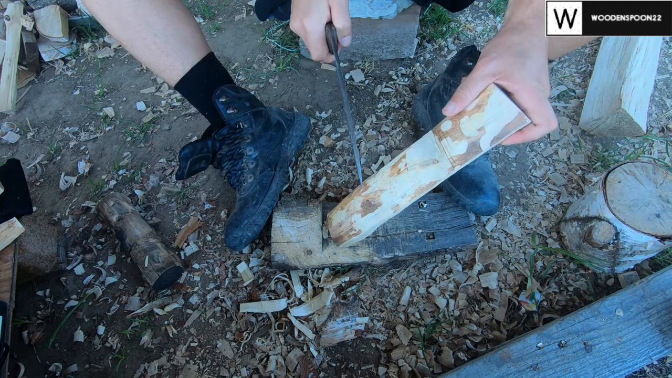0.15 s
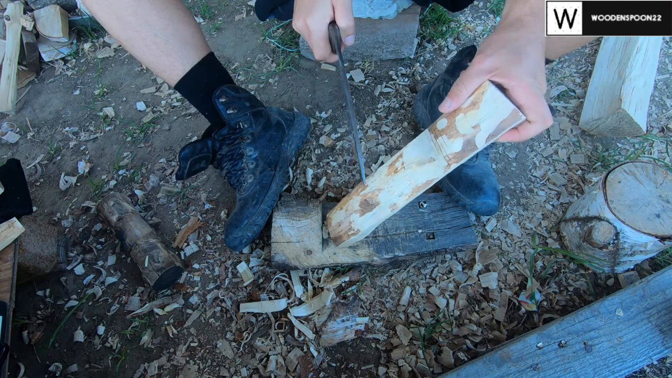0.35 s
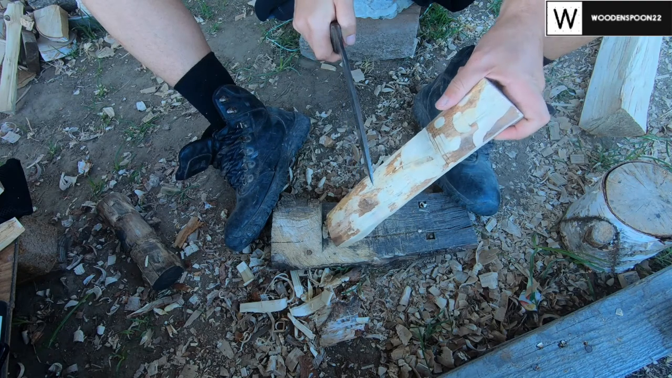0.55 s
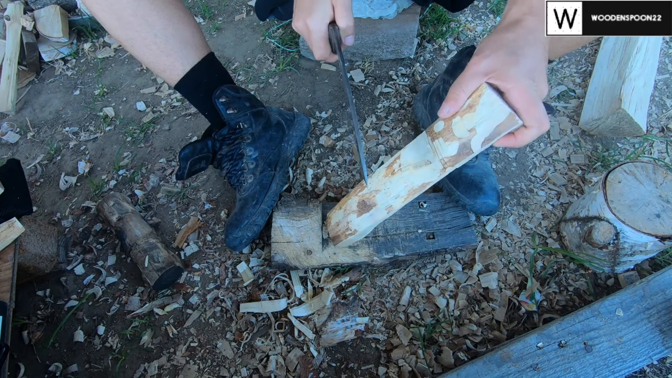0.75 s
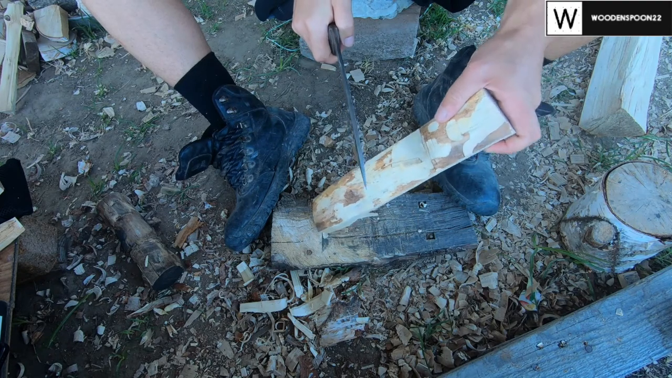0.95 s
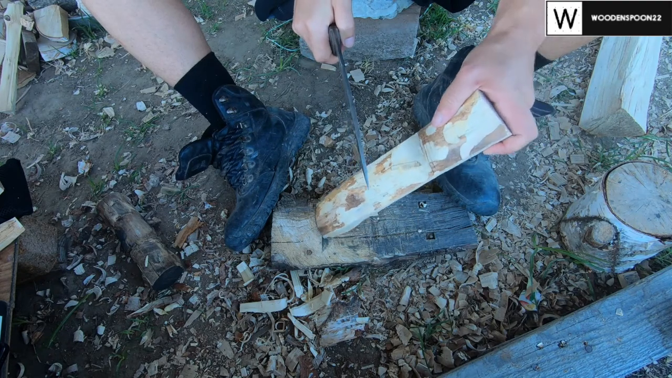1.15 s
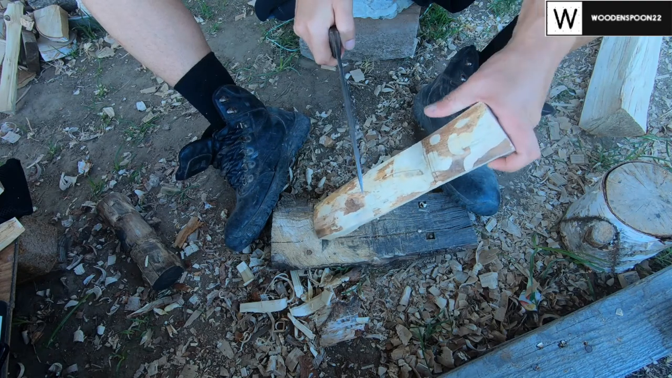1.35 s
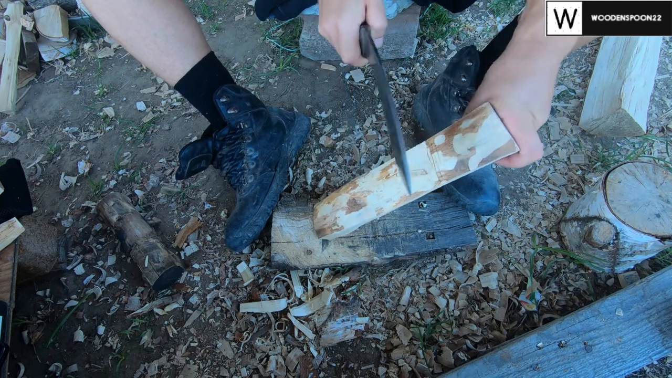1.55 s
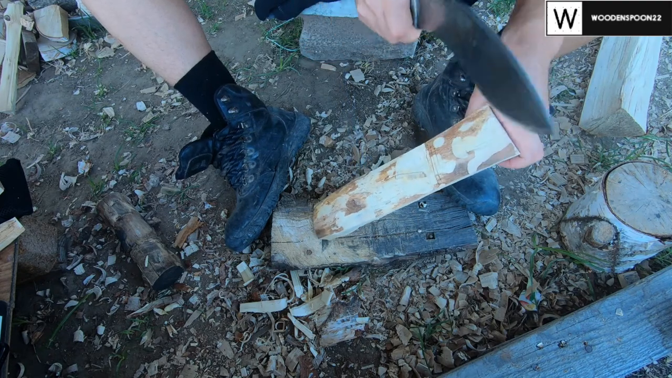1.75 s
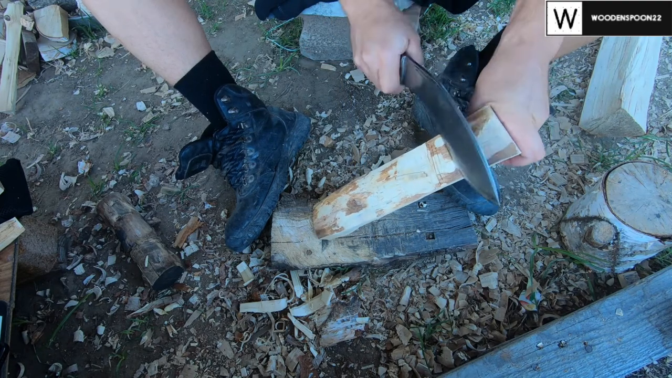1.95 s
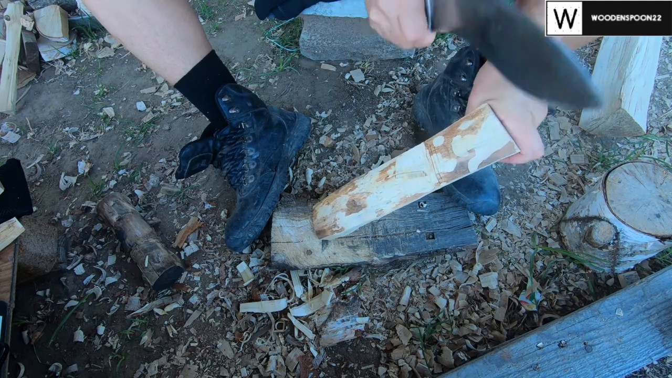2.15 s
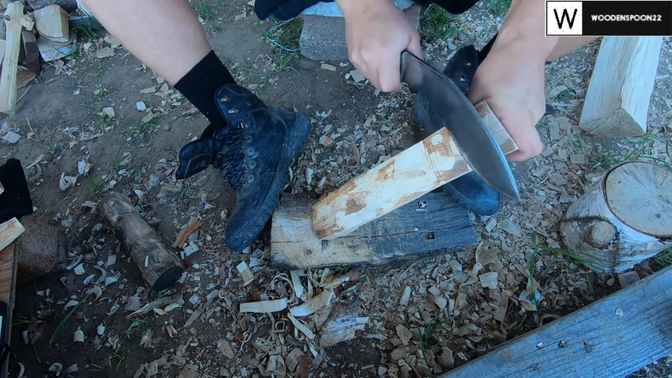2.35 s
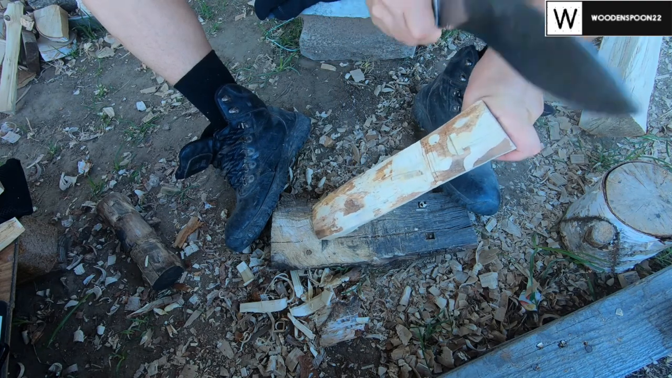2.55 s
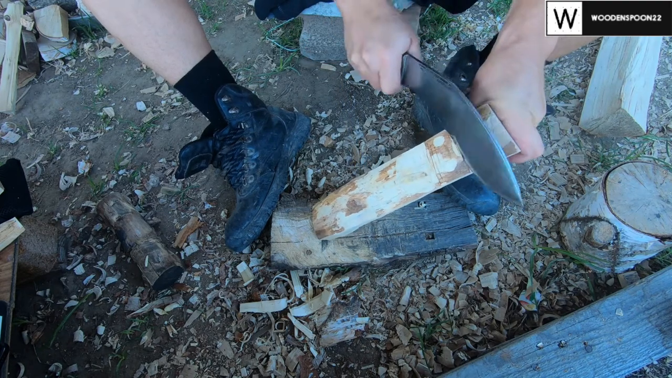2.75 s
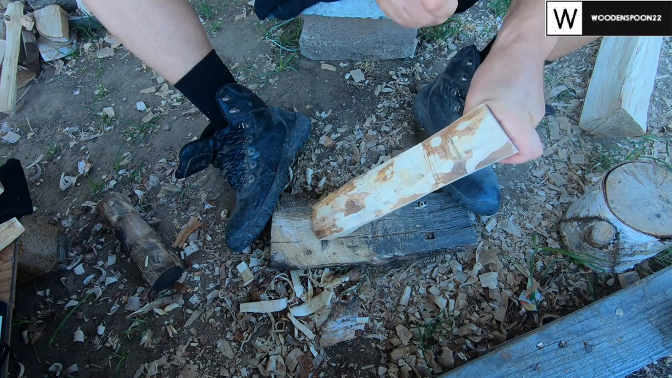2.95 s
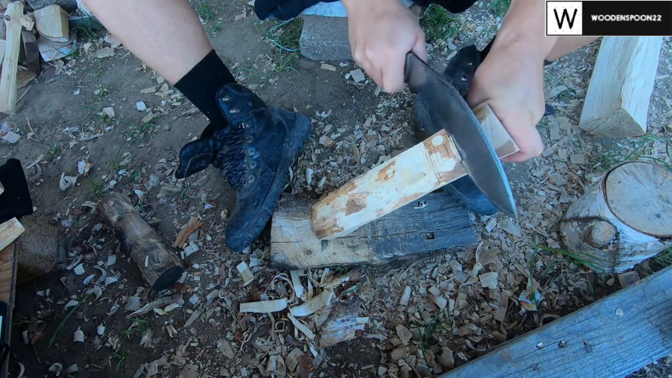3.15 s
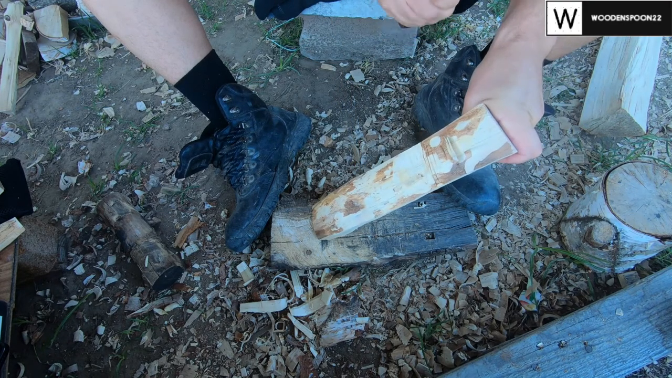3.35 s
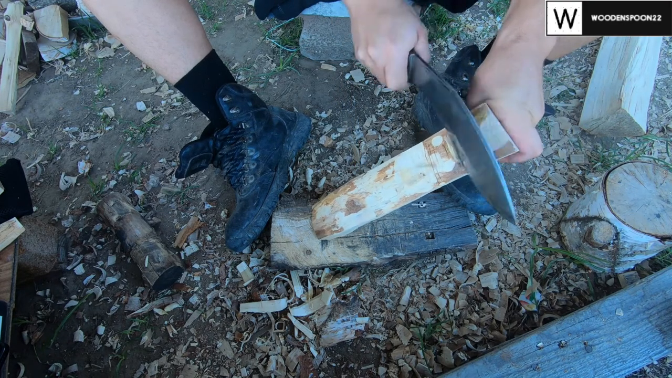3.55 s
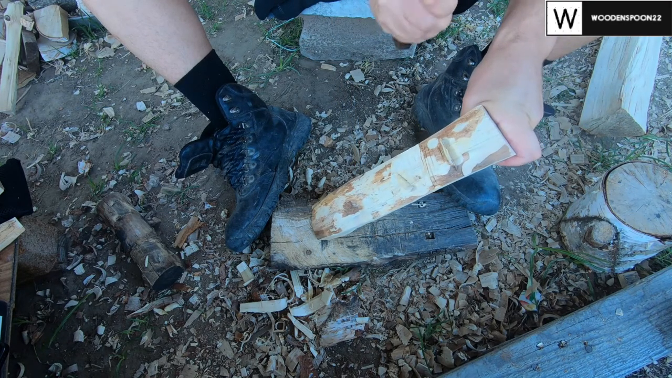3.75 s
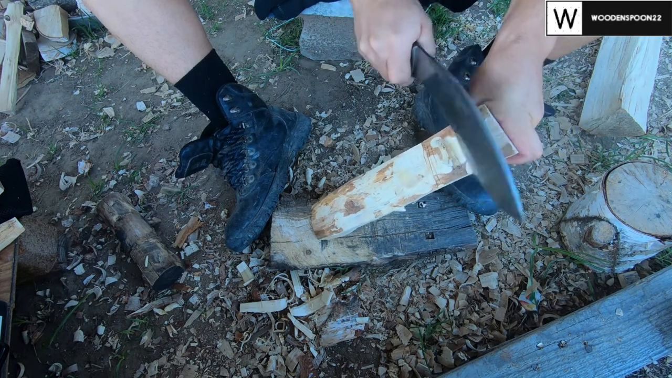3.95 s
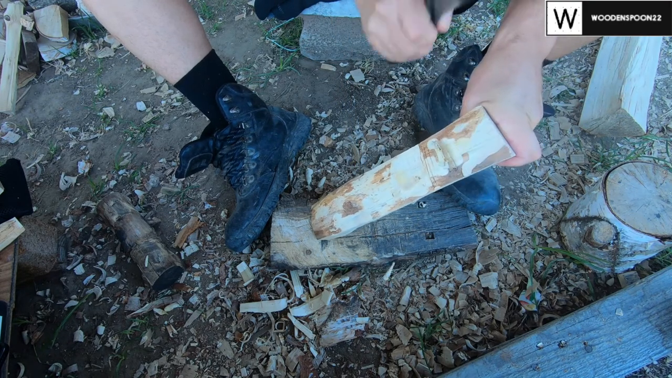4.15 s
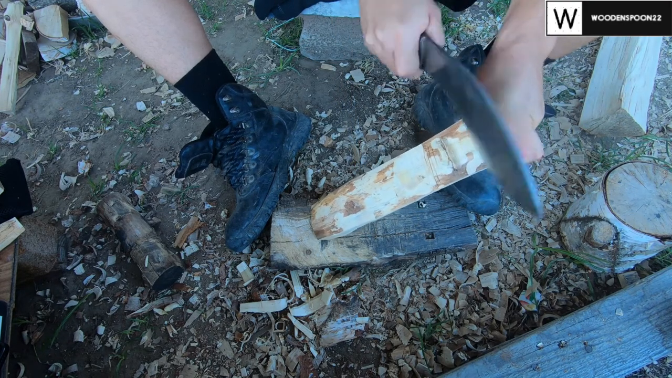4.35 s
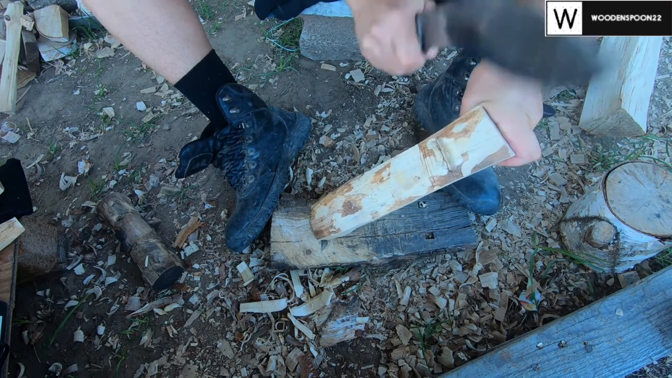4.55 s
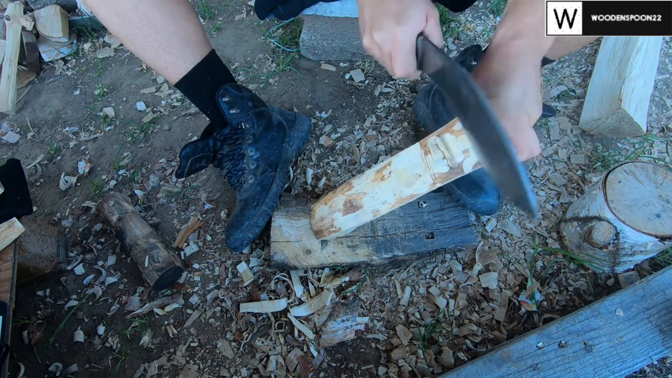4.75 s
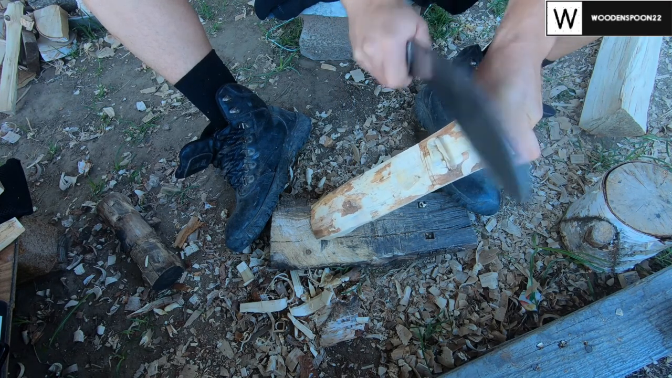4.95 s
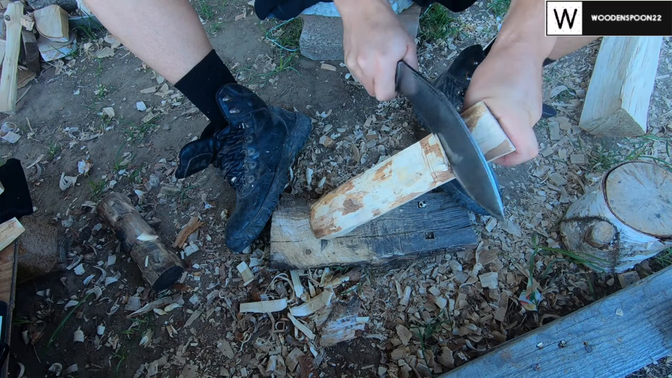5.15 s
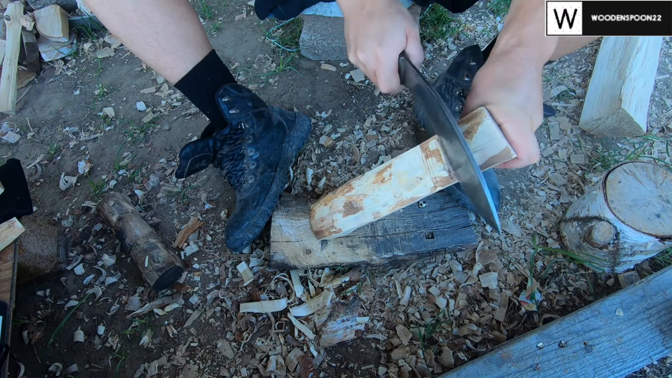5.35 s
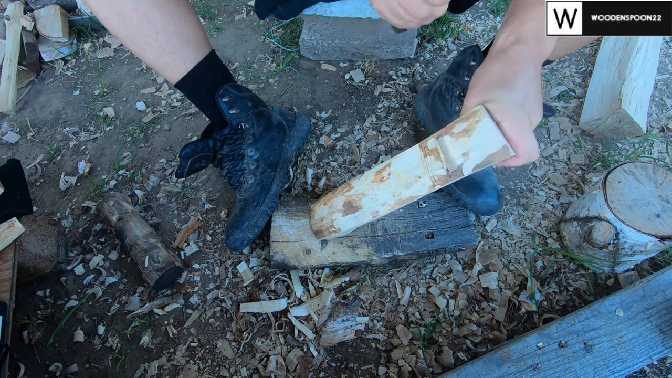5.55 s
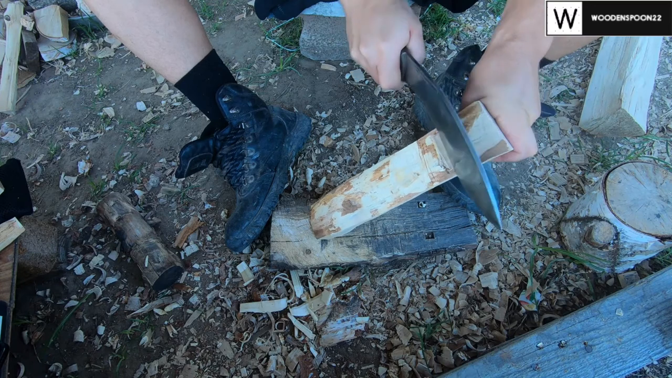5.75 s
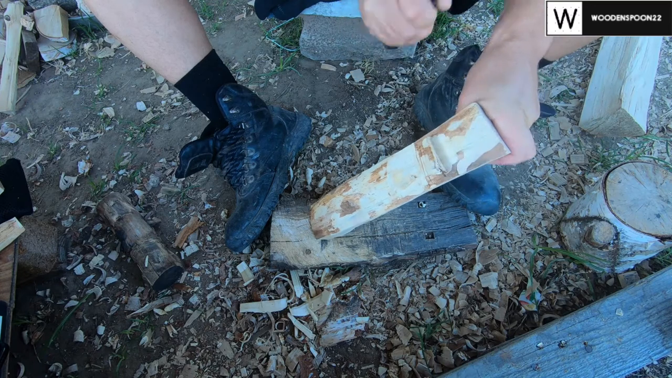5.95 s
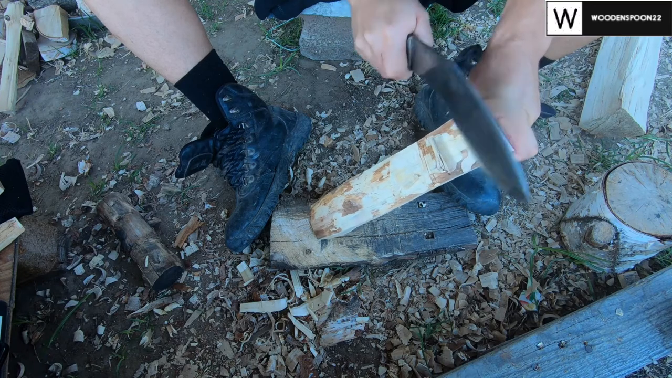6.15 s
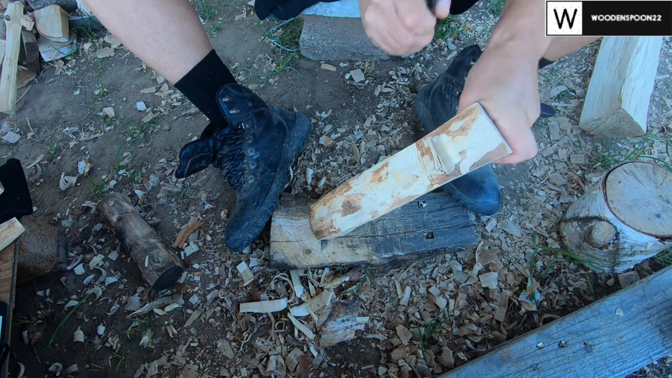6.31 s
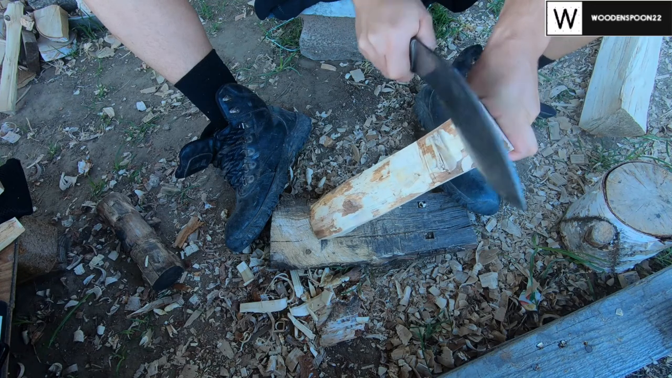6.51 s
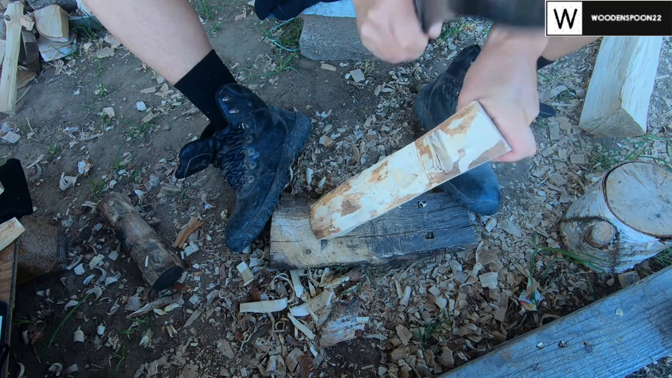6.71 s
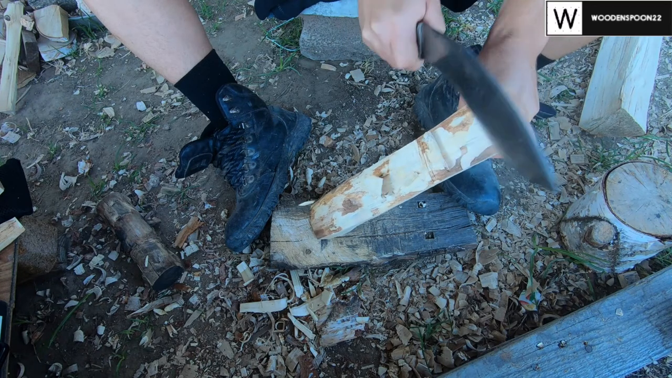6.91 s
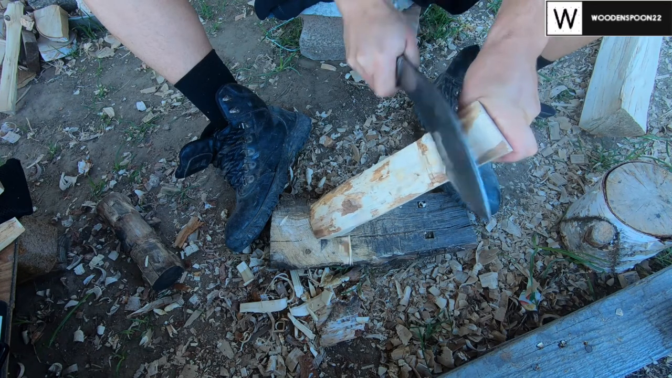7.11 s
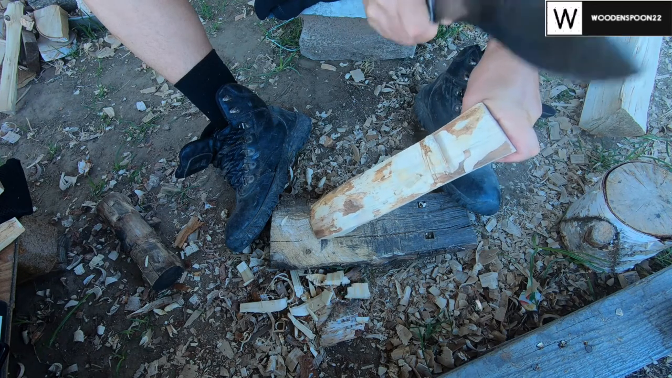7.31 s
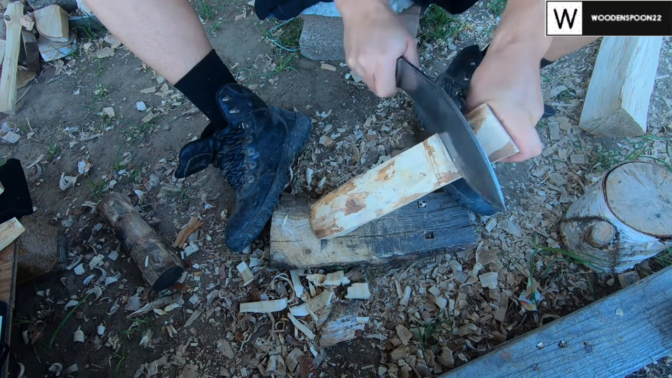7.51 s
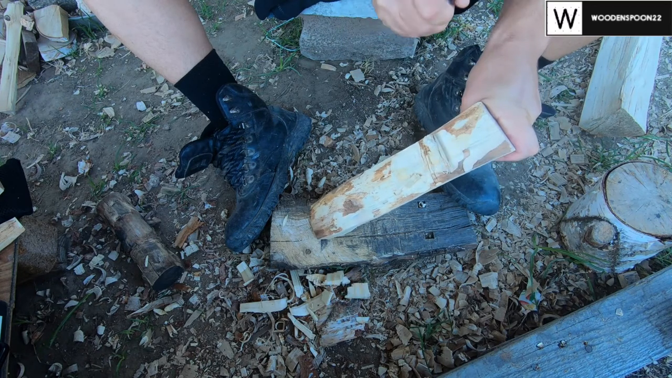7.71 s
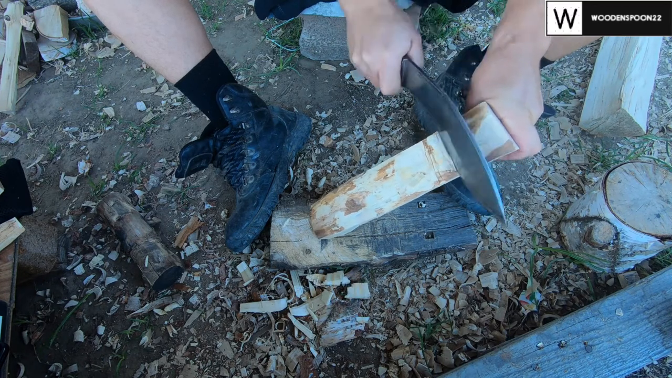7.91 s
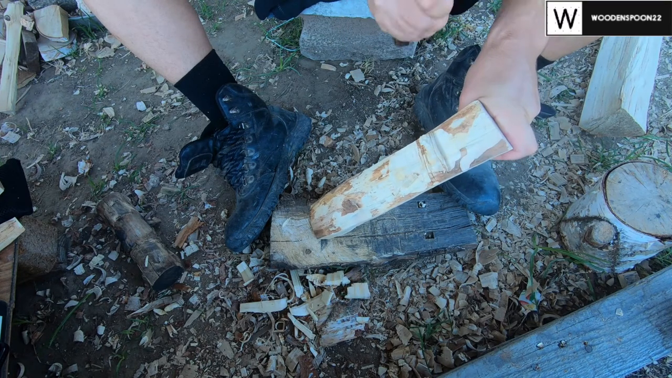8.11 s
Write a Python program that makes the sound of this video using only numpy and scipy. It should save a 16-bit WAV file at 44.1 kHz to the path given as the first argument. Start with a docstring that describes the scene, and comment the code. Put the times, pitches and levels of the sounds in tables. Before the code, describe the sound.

A heavy knife chops a birch blank on a wooden block outdoors, sharp woody thwacks at a steady pace after light taps and a scrape.

```python
"""A quiet outdoor hum opens, with a bright tick and a short scrape; light taps follow, then steady chops.
A heavy knife chops a birch blank that is braced on a wooden block.
Each blow rings modes of blank, blade and block, cracks, thumps the ground and scatters back as noise.
Chips are short noise bursts, scrapes are resonances fed by random slips, far bird notes are gliding sines.
Gusts are lumpy low noise in the two microphone ports."""
import sys
import numpy as np
from scipy import signal
from scipy.fft import rfft, irfft, next_fast_len
from scipy.io import wavfile

SR = 44100
rng = np.random.default_rng(int(sys.argv[2]) if len(sys.argv) > 2 else 0)


def to_wav(sig):
    """Store sig (one row per channel, or 1-D mono) as 16-bit WAV at the path in sys.argv[1].

    Samples outside -1..1 are clipped; the rate is SR.
    """
    pcm = np.clip(np.atleast_2d(sig), -1, 1) * 32767
    pcm = np.round(pcm).astype(np.int16)
    wavfile.write(sys.argv[1], SR, pcm.T)  # frames by channels


N = 360297


def from_db(db):
    """Decibels to gain."""
    return 10 ** (np.asarray(db) / 20)


def rms_one(x):
    """Scale to unit rms."""
    return x / np.sqrt(np.mean(x ** 2) + 1e-20)


def in_time(rows):
    """Columns of a curve table, sample by sample."""
    s, *columns = np.transpose(rows)
    return [np.interp(np.arange(N) / SR, s, column) for column in columns]


def at_hz(points, hz, column=1):
    """Read a spectrum table on a log-frequency axis."""
    table = np.array(points)
    return np.interp(np.log(np.maximum(hz, 1)), np.log(table[:, 0]), table[:, column])


def drift(rate_hz):
    """Slow random wander of spread 1, drawn every 40 samples and joined by straight lines."""
    r = np.exp(-80 * np.pi * rate_hz / SR)
    draws = rng.standard_normal(N // 40 + 2002)
    slow = signal.lfilter([1], [1, -2 * r, r * r], draws)[2000:]   # skip the settling
    return np.interp(np.arange(N) / 40, np.arange(len(slow)), rms_one(slow))


def ring(clicks, hz, t60):
    """A unit click sets a sine of height 1 ringing, down 60 dB after t60 seconds."""
    r, w = from_db(-60 / (t60 * SR)), 2 * np.pi * hz / SR
    return signal.lfilter([0, np.sin(w)], [1, -2 * r * np.cos(w), r * r], clicks + 1e-18)


def later(x, s):
    """Delay by s seconds."""
    lag = max(round(s * SR), 1)
    return np.concatenate([np.zeros(lag), x[:-lag]])


def steep(x, hz):
    """A two-pole low-pass applied twice."""
    low = signal.butter(2, min(hz, .45 * SR), fs=SR, output="sos")
    return signal.sosfilt(np.vstack([low, low]), x)


def coloured(spectrum, likeness):
    """Stereo noise with the given spectrum and left-right likeness; rms 1."""
    size = next_fast_len(N)
    hz = np.arange(size // 2 + 1) * SR / size
    mid, side = rfft(rng.standard_normal((2, size))) * from_db(at_hz(spectrum, hz))
    alike = np.clip(at_hz(likeness, hz), 0, 1)
    both = np.sqrt(1 + alike) * mid + np.sqrt(1 - alike) * side * [[1], [-1]]
    return rms_one(irfft(both, size)[:, :N])


# the hum's swell: (time [s], level [dB])
HUM_LEVEL = [(0.0, -49), (1.2, -48.5), (2.9, -50.5), (5.4, -49), (6.3, -51), (6.9, -47.5), (8.17, -51.5)]
# the hum's spectrum: (frequency [Hz], relative level [dB per Hz])
HUM_SPECTRUM = [(24, -26.5), (40, 4), (81, -4), (444, -25), (852, -22), (1070, -24.5), (1520, -25.5),
                (6650, -40), (8990, -37.5), (9940, -40.5), (11600, -55.5), (13800, -69.5), (16000, -78.5)]
# how wide the hum sits: (frequency [Hz], left-right likeness [0 to 1])
HUM_LIKENESS = [(60, 0.76), (150, 0.38), (300, 0.93), (640, 0.27), (3000, 0.65), (7000, .01)]


def hum():
    """Far traffic and leaves: a smooth wide floor of noise."""
    level_db = in_time(HUM_LEVEL)[0] + 0.23 * drift(8.7)
    return from_db(level_db) * coloured(HUM_SPECTRUM, HUM_LIKENESS)


# far bird notes: (time [s], length [s], first pitch [Hz], last pitch [Hz], mid-note level [dB rms])
BIRD_NOTES = [(5.83, 0.019, 4780, 4900, -71.5), (5.863, 0.022, 4700, 4800, -69), (8.3, .2, 595, 630, -61),
              (6.9, 0.26, 386, 409, -62.5)]
NOTE_FADE = 0.14   # share of the note spent swelling, and again dying


def birds():
    """Soft gliding sine notes whose level wavers a little."""
    out, t = np.zeros(N), np.arange(N) / SR
    for s, length, first_hz, last_hz, level_db in BIRD_NOTES:
        done = np.clip((t - s) / length, 0, 1)
        fade = np.clip(np.minimum(done, 1 - done) / NOTE_FADE, 0, 1)
        hz = first_hz + (last_hz - first_hz) * done
        note = np.sin(2 * np.pi * np.cumsum(hz) / SR)
        out += np.sqrt(2) * fade * from_db(level_db + 1.1 * drift(19)) * note
    return out


# gusts coming and going: (time [s], level [dB], left-right difference [dB])
GUST_LEVELS = [(0.0, -67, -8), (0.68, -67, 2), (1.07, -69, -16), (1.25, -40, -10), (1.41, -40, -3),
               (1.68, -23.5, -4), (1.87, -33, -10.5), (2.02, -39, -4), (2.09, -29, -12), (2.3, -27, -10.5),
               (2.5, -29.5, -11), (2.64, -20, -1), (2.87, -34.5, -2.5), (3.0, -32, -8), (3.27, -39.5, -8.5),
               (3.47, -52, -1), (3.65, -43.5, -7.5), (4.0, -31.5, -8.5), (4.27, -30.5, -8),
               (4.4, -40.5, -7), (4.62, -39.5, -1.5), (4.85, -46.5, -9), (5.12, -42.5, -12),
               (5.27, -29.5, -8.5), (5.6, -30.5, -7), (5.85, -41, -7), (6.17, -36.5, -7), (6.3, -44.5, -4),
               (6.8, -42, -4.5), (7.08, -57, 0.5), (7.35, -47.5, -7), (7.5, -63, -5), (7.65, -44.5, -5.5),
               (8.17, -60, -3)]
# spectrum of the buffeting: (frequency [Hz], relative level [dB per Hz])
BUFFET_SPECTRUM = [(12, -27.5), (20, -5.5), (38, 4), (92, -2), (131, -10), (226, -24), (450, -42.5),
                   (580, -71.5), (990, -120)]


def wind():
    """Air turbulence at the ports: lumpy low noise, nearly unrelated left and right."""
    level_db, pan_db = in_time(GUST_LEVELS)
    lumps_db = np.array([2.8 * drift(7) + 2.5 * drift(35) for side in range(2)])
    noise = coloured(BUFFET_SPECTRUM, [(20, 0.041), (400, 0.064)])
    side_db = level_db + pan_db / 2 * [[1], [-1]]
    return from_db(side_db) * rms_one(noise * from_db(lumps_db))


# the blank scraping as it shifts:
# (time [s], length [s], drive level [dB], resonance [Hz], ring-out to -60 dB [cycles])
SCRAPE_STROKES = [(0.093, .12, -43, 7000, 3), (0.158, 0.054, -47.5, 3500, 11),
                  (0.16, 0.14, -41.5, 1320, 5.1), (.73, .06, -63, 5000, 8.5), (1.16, 0.91, -52, 1410, 6.5),
                  (1.17, 0.3, -52, 7300, 3.5), (1.174, 0.06, -52, 3400, 60), (1.262, 0.05, -50, 3400, 60),
                  (1.32, 0.04, -60, 3450, 60), (1.38, .1, -52, 8500, 3.5), (6.878, .25, -60, 6000, 2.5)]
SLIPS_PER_S = 1200


def scrapes():
    """Uneven slips excite one resonance of the wood while the blank slides."""
    out, t = np.zeros(N), np.arange(N) / SR
    for s, length, level_db, hz, cycles in SCRAPE_STROKES:
        rise, fall = (t - s) / 0.0025, (s + length - t) / (0.91 * length)
        stroke = np.clip(np.minimum(rise, fall), 0, 1)
        slips = rng.standard_normal(N) * (rng.random(N) < SLIPS_PER_S / SR) * stroke
        out += from_db(level_db) * steep(ring(slips, hz, cycles / hz), 2.0 * hz)
    return signal.sosfilt(signal.butter(2, 800, "high", fs=SR, output="sos"), out)


# chips and grit landing: (time [s], level before band-pass [dB], pitch [Hz], t60 [s])
CHIP_LANDINGS = [(0.0974, -23.5, 8900, 0.012), (0.8824, -45.5, 3120, 0.021), (1.208, -38, 3370, 0.012),
                 (1.3933, -45, 3390, 0.016), (1.5963, -43, 3300, 0.014), (5.3193, -39.5, 5000, 0.016),
                 (5.331, -46, 7020, 0.044), (6.513, -46.5, 9000, 0.012), (6.904, -43.5, 7360, 0.012),
                 (6.93, -37.5, 4300, 0.013), (6.9476, -45, 4230, 0.013), (7.0025, -40, 4700, 0.025),
                 (7.0394, -50, 3440, 0.017), (7.077, -42.5, 2660, 0.025), (7.2452, -41, 3010, 0.015),
                 (7.2514, -43.5, 3660, 0.036), (7.637, -40.5, 2460, 0.015)]


def chips():
    """Each chip is a tiny dying burst of noise round its own pitch."""
    out = np.zeros(N)
    t = np.arange(SR // 20) / SR
    for s, level_db, hz, t60 in CHIP_LANDINGS:
        edges = [hz * 0.76, min(hz * 1.85, .45 * SR)]
        band = signal.butter(1, edges, "band", fs=SR, output="sos")
        burst = signal.sosfilt(band, rng.standard_normal(len(t))) * from_db(level_db - 60 * t / t60)
        at = round(s * SR)
        out[at:at + len(t)] += burst
    return out


# knife blows, the first three light taps as the blank is set down:
# (time [s], force [dB], hardness [dB], edge ring [dB], thump [dB], crack [dB])
KNIFE_BLOWS = [(1.0159, -19.5, -19.5, -41, -7.5, -15.5), (1.18, -37.5, -7, -14, 5, -6),
               (1.2916, -22.5, -18, -28, -12.5, -17), (1.9684, -12, -3.5, -7, -7, -12),
               (2.3606, -10.5, -1, -17, -4, -10.5), (2.744, -18.5, 17.5, 2.5, 1.5, 11),
               (3.1231, -11, 1, -2.5, -11, -1.5), (3.503, -16.5, 13.5, 0, 4.5, 2.5),
               (3.8699, -12.5, 5, 3, -2, -12), (4.2412, -11.5, 3, -1.5, -6.5, -12),
               (4.6187, -11, -4.5, -12, -3, -16.5), (4.624, -18, 5.5, 5.5, -9, 2.5),
               (5.0062, -13, 4.5, 5.5, -3.5, 1), (5.687, -16.5, 12.5, 8.5, -2.5, 13),
               (6.0633, -11, 5.5, -8.5, -6, -1.5), (6.4211, -12.5, 2, 0, -7, -3),
               (6.8035, -11.5, 4, -2.5, -11, -6.5), (7.1569, -12.5, 7, -6.5, -5, -6),
               (7.1636, -10, -8, -18, -18, -11), (7.5174, -13, 7.5, 0.5, -6, 1.5),
               (7.886, -15.5, 9.5, 7.5, -3.5, 10)]
# how each part answers a blow, by part name:
# (level over the force [dB], shares of hardness, edge ring, thump, crack [dB per dB])
PART_ANSWERS = {"low": (-1.4, -0.43, 0.16, .1, -0.17), "high": (0, 0, 0, 0, 0), "knock": (0, 1, 0, 0, 0),
                "crack": (0, 0, 0, 0, 1), "blade": (0, 0, 1, 0, 0), "tearing": (-15, 0.39, 0.47, 0, 0),
                "rebound": (-13, -.5, 0.13, 0.02, 0.2), "block": (1.5, -0.13, -0.013, 0.76, 0.066),
                "ground": (0, 0, 0, 1, 0)}


def answer(part):
    """Level in dB of one part at every blow."""
    force_db, *manner = np.transpose(KNIFE_BLOWS)[1:]
    level_db, *shares = PART_ANSWERS[part]
    return force_db + level_db + np.dot(shares, manner)


def placed(pieces, delay_s=0.):
    """One piece of sound for each blow, laid at its moment."""
    out = np.zeros(pieces.shape[1:-1] + (N + SR,))
    for blow, piece in zip(KNIFE_BLOWS, pieces):
        at = round((blow[0] + delay_s) * SR)
        out[..., at:at + piece.shape[-1]] += piece
    return out[..., :N]


# scatter from logs and boards: (frequency [Hz], level against the blow [dB], t60 [s])
YARD_SCATTER = [(201, -19, 0.18), (736, -32, 0.16), (1600, -24.5, 0.15), (2540, -35.5, 0.2),
                (3445, -32, 0.13), (6040, -30.5, 0.16), (12000, -39.5, 0.085)]
# wood resonances that colour the scatter: (frequency [Hz], width [Hz], level [dB])
TIMBER_MODES = [(261, 8, 3), (882, 14, 7.5), (1320, 48, -8), (1650, 22, 5), (2510, 37, -1.5),
                (3700, 400, 5), (5610, 120, 3), (8960, 510, 1)]
SCATTER_DELAY_S = .004
# the scatter of a part follows that part by share TAIL_OWN, and the blank's high modes by the rest
TAIL_DB, TAIL_OWN = -2, 0.74


def scatter():
    """Each blow comes back lumpy, coloured like the blow, dying band by band, less alike up high."""
    parts = ("block", "low", "high", "knock", "crack", "blade", "blade")   # one for each yard row
    levels = np.transpose([TAIL_DB + TAIL_OWN * answer(part) + (1 - TAIL_OWN) * answer("high")
                           for part in parts])
    log_centres = np.log(np.array(YARD_SCATTER)[:, 0])
    t = np.arange(SR // 3) / SR
    edges = 130 * 2 ** np.arange(0, 7, .5)   # half-octave bands [Hz]
    out = 0
    for low, high in zip(edges, edges[1:]):
        hz = np.sqrt(low * high)
        blow_db = np.array([np.interp(np.log(hz), log_centres, row) for row in levels])
        common = rng.standard_normal((len(KNIFE_BLOWS), 1, len(t)))
        own = rng.standard_normal((len(KNIFE_BLOWS), 2, len(t)))
        noise = common + min(hz / 1500, .7) * own
        band_pass = signal.butter(2, [low, high], "band", fs=SR, output="sos")
        band = rms_one(signal.sosfilt(band_pass, noise))
        dying_db = -60 * t / at_hz(YARD_SCATTER, hz, column=2)
        # near things answer first: a strong early part dies nine times faster
        shape = (from_db(dying_db) + 4 * from_db(9.0 * dying_db)) * np.minimum(t / 0.0013, 1)
        out = out + band * from_db(blow_db + at_hz(YARD_SCATTER, hz))[:, None, None] * shape
    wash = placed(out, SCATTER_DELAY_S) * from_db(2.2 * drift(90))
    coloured_wash = wash
    for hz, width, level_db in TIMBER_MODES:
        top_one = 2 * np.pi * width / SR   # scales the resonance to about gain 1 on top
        coloured_wash = coloured_wash + from_db(level_db) * top_one * ring(wash, hz, 2.2 / width)
    return coloured_wash


def struck(modes, blow_db, tearing, spread_db, shift, soft_hz):
    """Blows land elsewhere, shifting mode levels and pitches; tearing feeds them; contact is rounded."""
    out = np.zeros(tearing.shape)
    luck = rng.standard_normal((len(KNIFE_BLOWS), len(modes), 2))
    for b, piece in enumerate(out):
        for k, (hz, level_db, t60) in enumerate(modes):
            clicks = tearing[b].copy()
            clicks[0] += from_db(blow_db[b] + spread_db * luck[b, k, 0])
            piece += ring(clicks * from_db(level_db), hz * (1 + shift * luck[b, k, 1]), t60)
    return steep(out, soft_hz)


# modes of each struck part, all as (nominal frequency [Hz], relative level [dB], t60 [s])
# the blank's low modes
BLANK_LOW_MODES = [(526, -4, 0.016), (680, -16, 0.036), (854, -9.5, 0.037), (914, -16.5, 0.034)]
# the blank's high modes
BLANK_HIGH_MODES = [(1420, -10, 0.017), (1495, -12, 0.017), (1652, -32, 0.014), (2063, 1, 0.029),
                    (1930, -14.5, 0.01456)]
# the hard knock
KNOCK_MODES = [(2340, -17, .008), (2585, -5.5, 0.012), (2731, -3.5, 0.013)]
# the crack
CRACK_MODES = [(3374, -7, 0.0058), (3416, -1, 0.012), (3900, -35, 0.0031)]
# the knife blade
BLADE_MODES = [(4500, -13, 0.0017), (5820, -8, 0.011), (5730, -38, 0.12), (6495, -15, 0.0041),
               (7430, -13, 0.0036), (8120, -14, .006), (8660, -14, 0.0084), (13600, -15.5, .006)]
# the blank knocked again by the rocking block
REBOUND_RING = [(1592, -2.5, .07), (1709, -2.5, 0.12), (1903, -16.5, .06)]
# the wooden block
BLOCK_MODES = [(200, -13.5, 0.0063), (251.7, -3, 0.092), (335, -10.5, 0.088)]
# the ground
GROUND_MODES = [(60.6, -15.5, 0.01), (83.4, -5.5, 0.12), (97.9, -17.5, 0.69), (115, -16, .1)]
# the block rocks and knocks the blank again: (delay [s], level [dB])
REBOUND_KNOCKS = [(.010, 1), (.030, -16.5)]
TEAR_S, TEAR_PER_S = .0035, 4900   # the edge travels through the grain; fibres torn per second
BOUNCE_S, BOUNCE_DB = .0012, -4   # second arrival, off the ground
PUSH_LEAD_S, GROUND_DELAY_S = .001, 0.0054   # the block leads, the ground lags


def chops():
    """Blank and blade reach the microphone twice (direct, off the ground); the ground answers late."""
    t = np.arange(SR // 8) / SR
    cutting = from_db(answer("tearing"))[:, None] * np.clip(3 * (1 - t / TEAR_S), 0, 1)
    tearing = cutting * rng.standard_normal(cutting.shape) * (rng.random(cutting.shape) < TEAR_PER_S / SR)
    bright = struck(BLANK_LOW_MODES, answer("low"), tearing * from_db(-3.5),
                    spread_db=4.5, shift=.012, soft_hz=1453)
    bright += struck(BLANK_HIGH_MODES, answer("high"), tearing * from_db(-5),
                     spread_db=1.5, shift=0.0097, soft_hz=2530)
    bright += struck(KNOCK_MODES, answer("knock"), tearing * from_db(-10.5),
                     spread_db=3.0, shift=0.0071, soft_hz=3180)
    bright += struck(CRACK_MODES, answer("crack"), tearing * from_db(-4),
                     spread_db=1.5, shift=0.02, soft_hz=4800)
    bright += struck(BLADE_MODES, answer("blade"), tearing * from_db(1.5),
                     spread_db=3.1, shift=0.035, soft_hz=15000)
    bright = placed(bright)
    bright += from_db(BOUNCE_DB) * later(bright, BOUNCE_S)
    still = np.zeros((len(KNIFE_BLOWS), SR // 2))   # no tearing
    high_pass = signal.butter(2, 1300, "high", fs=SR, output="sos")
    for delay_s, level_db in REBOUND_KNOCKS:
        again = struck(REBOUND_RING, answer("rebound") + level_db, still,
                       spread_db=1.0, shift=0.018, soft_hz=1970)
        bright += placed(signal.sosfilt(high_pass, again), delay_s)
    block = struck(BLOCK_MODES, answer("block"), still, spread_db=3.0, shift=0.015, soft_hz=716)
    ground = struck(GROUND_MODES, answer("ground"), still, spread_db=2.5, shift=0.013, soft_hz=430)
    # the block enters with opposite sign
    return bright - placed(block, -PUSH_LEAD_S) + placed(ground, GROUND_DELAY_S)


# stereo lean of near sounds: (frequency [Hz], left-right difference [dB], left lead [rad])
PORT_LEAN = [(60, 0, 0), (380, 0, .1), (700, -1.7, .35), (1300, -3.5, .55), (2500, -1.5, .25),
             (5000, .2, -.8), (9000, 1.2, -1.1), (14000, -3, -1.5)]
MIC_EDGE_HZ, MIC_TOP_DB = 10300, -14.5   # top edge; level of the full-band copy mixed back in


def ports(x):
    """Two microphone ports hear near sounds with a lean in level and phase, and lose their top."""
    size = next_fast_len(N + SR // 10)
    hz = np.arange(size // 2 + 1) * SR / size
    half = np.array([[.5], [-.5]])
    level = from_db(half * at_hz(PORT_LEAN, hz))
    phase = np.exp(1j * half * at_hz(PORT_LEAN, hz, column=2))
    near = irfft(rfft(x, size) * level * phase, size)[:, :N]
    below = signal.sosfilt(signal.cheby1(6, 1, MIC_EDGE_HZ, fs=SR, output="sos"), near)
    return below + from_db(MIC_TOP_DB) * near


def scene():
    """Chopping in its surroundings, with wind, hum and birds."""
    near = chops() + scatter() + chips() + scrapes()
    return ports(near) + wind() + hum() + birds()


CUTOFF_HZ = 16349


def record(dry):
    """Peaks beyond 0.97 clip, then a steep low-pass cuts the top."""
    low_pass = signal.cheby2(12, 70, CUTOFF_HZ, fs=SR, output="sos")
    return signal.sosfilt(low_pass, np.clip(dry, -.97, .97))


dry = scene()
out = record(dry)
to_wav(out)
```